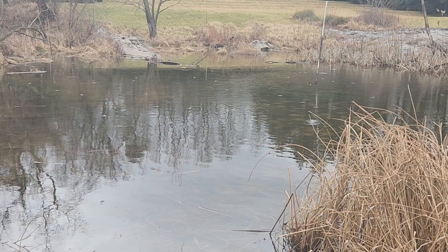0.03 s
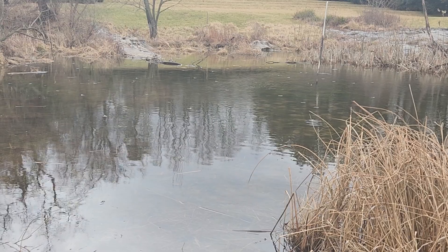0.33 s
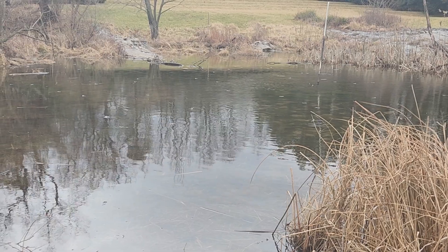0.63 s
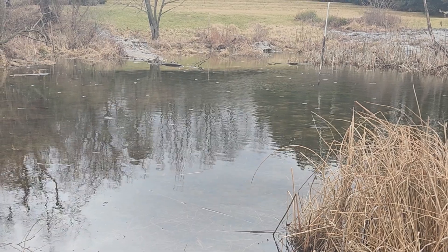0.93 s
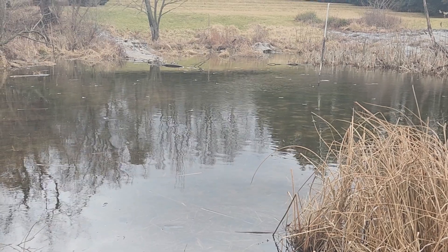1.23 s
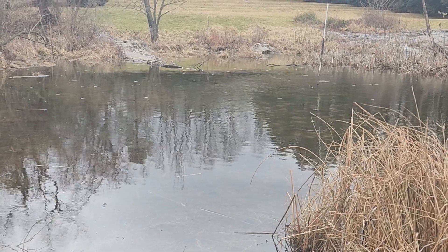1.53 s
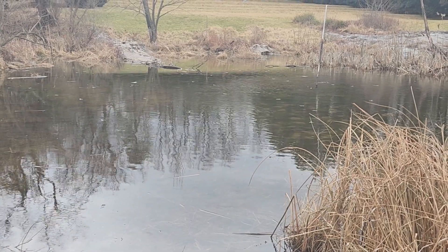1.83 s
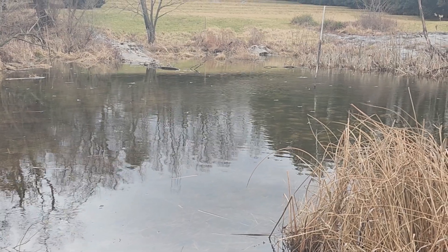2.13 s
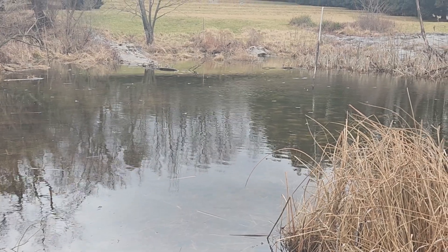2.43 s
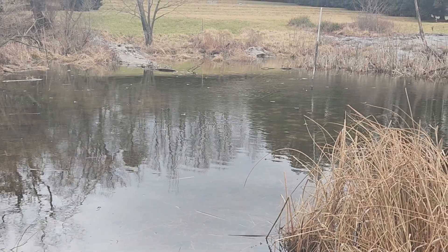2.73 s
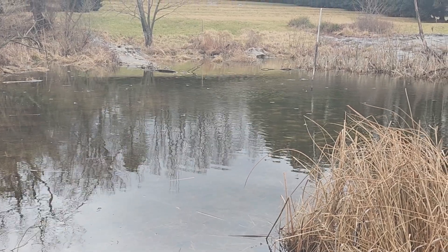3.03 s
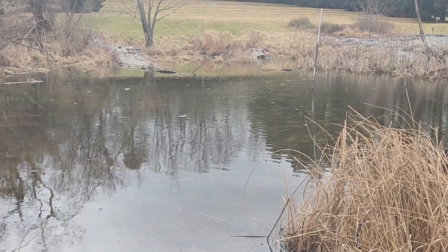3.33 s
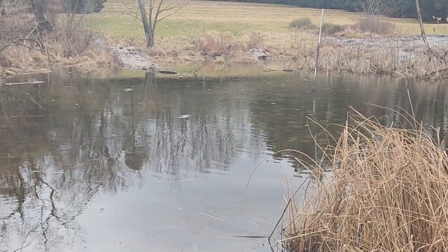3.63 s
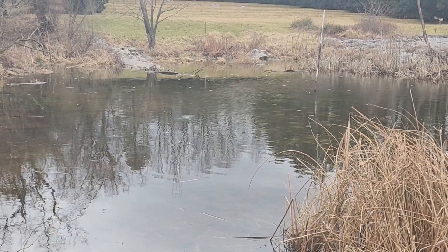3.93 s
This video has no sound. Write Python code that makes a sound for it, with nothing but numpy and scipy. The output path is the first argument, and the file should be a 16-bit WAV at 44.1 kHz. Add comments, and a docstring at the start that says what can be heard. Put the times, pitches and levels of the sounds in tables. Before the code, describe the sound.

Many frogs croak in a dense, overlapping chorus of short quacks on a pond.

```python
"""Wood frogs quack all over a pond in open country. Each croak is a short, quickening train of
pulses that makes the frog's vocal sacs ring. Farther frogs fill the gaps, small birds chirp high
and faint, and both echo off the banks. A low rumble, a soft hiss and puffs of wind lie underneath.
The microphone opens with a bump and a rub of the hand; dry reeds tick now and then."""
import sys
import numpy as np
from scipy import signal
from scipy.fft import rfft, irfft, next_fast_len
from scipy.io import wavfile
from scipy.ndimage import uniform_filter1d, map_coordinates

SR = 44100
rng = np.random.default_rng(int(sys.argv[2]) if len(sys.argv) > 2 else 0)


def pcm_store(signal):
    """Save signal as 16-bit PCM."""
    levels = np.round(np.clip(np.atleast_2d(signal), -1, 1) * 32767)
    wavfile.write(sys.argv[1], SR, levels.astype(np.int16).T)


N = 176400  # 4 seconds
TIME = np.arange(N) / SR


def amp(db):
    """Turn decibels into a gain."""
    return 10 ** (np.asarray(db) / 20)


def unit(x):
    """Scale a sound to an average (rms) level of 1."""
    return x / np.sqrt(np.mean(x ** 2) + 1e-20)


def along(points, hz):
    """Read between (Hz, value) rows on a logarithmic frequency scale."""
    freqs, values = np.transpose(points)
    return np.interp(np.log(hz + 1), np.log(freqs + 1), values)


def curve(rows, t=TIME):
    """Join (seconds, value) rows with straight lines."""
    return np.interp(t, *np.transpose(rows))


def wobble(rate):
    """A smooth curve through `rate` random values a second."""
    return map_coordinates(rng.standard_normal(int(N * rate / SR) + 4), [TIME * rate])


def filtered(x, gain_at):
    """Turn each frequency up or down by gain_at(hz)."""
    size = next_fast_len(N + SR // 2)
    return irfft(rfft(x, size) * gain_at(np.fft.rfftfreq(size, 1 / SR)), size)[..., :N]


def placed(x, pan_db=0, lag_s=0):
    """Make a sound stereo, with the left side pan_db louder and lag_s later."""
    left, right = unit(amp([pan_db / 2, -pan_db / 2]))
    return np.array([left * np.roll(x, round(lag_s * SR)), right * x])


def add(out, start_s, x):
    """Mix the stereo sound x into out from start_s on."""
    start = round(start_s * SR)
    first, end = max(start, 0), min(start + x.shape[1], N)
    if end > first:
        out[:, first:end] += x[:, first - start:end - start]


# How wide noise sounds. Each row: frequency in Hz, side level against the middle in dB.
STEREO_WIDTH = [(50, -5.5), (130, -4), (300, -4), (650, -7), (3000, 0)]

def noise(colour):
    """Stereo noise shaped by (Hz, dB) rows, narrower in the bass."""
    white = rng.standard_normal((2, N))
    mid, side = filtered(white, lambda hz: amp(along(colour, hz)))
    side = filtered(side, lambda hz: amp(along(STEREO_WIDTH, hz)))
    return unit(np.array([mid + side, mid - side]))


# How the rumble eases off. Each row: time in seconds, relative level in dB.
RUMBLE_LEVELS = [(.4, -38), (1.4, -38), (1.8, -41.5), (2.3, -41), (2.55, -44), (4, -44)]
# The tone of the rumble and of the air. Each row: frequency in Hz, relative level in dB.
RUMBLE_TONE = [(20, -10.5), (35, -7), (55, 0), (78, 2.5), (115, -3.5), (160, -11.5), (250, -20), (700, -33),
               (5000, -92)]
AIR_TONE = [(200, -20), (700, 12), (1500, -10), (2500, -6.5), (4300, -13), (5800, -25), (7500, -20.5),
            (8800, -32.5), (15500, -36)]

def outdoors():
    """An uneven low rumble and a soft hiss of air."""
    rumble = amp(curve(RUMBLE_LEVELS) + 4 + 1.6 * wobble(rate=10)) * noise(RUMBLE_TONE)
    air = amp(-51.5 + wobble(rate=1.7)) * noise(AIR_TONE)
    return rumble + air


# Puffs of wind. Each row: time of the peak in seconds, level in dB.
WIND_PUFFS = [(.46, -39), (2.08, -40), (2.24, -37), (2.37, -36)]

def wind_puffs(centre_hz=165, db_per_octave=22, db_per_s=330):
    """Wind hits the microphone in short, soft thuds, different on each side."""
    level = sum(amp(db - db_per_s * np.abs(TIME - peak_s)) for peak_s, db in WIND_PUFFS)
    white = rng.standard_normal((2, N))
    thuds = filtered(white, lambda hz: amp(-db_per_octave * np.abs(np.log2((hz + 1) / centre_hz))))
    return level * unit(thuds)


# A hand rubbing the case. Each row: time in seconds, level in dB.
RUB_LEVELS = [(.085, -41), (.11, -28), (.18, -33.5), (.26, -30.5), (.335, -32.5), (.43, -94.5)]
# The tone of the rub. Each row: frequency in Hz, relative level in dB.
RUB_TONE = [(30, -24), (130, 4), (250, -3), (400, -6), (600, -16), (2000, -37), (8000, -65.5)]

def handling(bump_hz=79.6, bump_fade_s=.08, click_s=.0015, click_rise_s=.00013):
    """A hand on the microphone's case: a click and a low bump, then a brief rub."""
    rub = filtered(rng.standard_normal((2, N)), lambda hz: amp(along(RUB_TONE, hz)))
    out = amp(curve(RUB_LEVELS)) * unit(rub)
    t = TIME[:SR // 4]
    bump = amp(-21 - 60 * t / bump_fade_s) * np.sin(2 * np.pi * bump_hz * t)
    click = -amp(-9.5) * np.exp(-t / click_s) * (1 - t / click_s)
    click *= 1 - np.exp(-t / click_rise_s)
    add(out, start_s=.0955, x=placed(bump) + placed(click, pan_db=12.5))
    return out


# Ticks of dry reeds. Each row: time in seconds, level in dB.
REED_TICKS = [(1.857, -55), (2.31, -69), (2.501, -56), (2.511, -56)]
# The tone of a tick. Each row: frequency in Hz, relative level in dB.
TICK_TONE = [(500, -33), (3000, -7), (7500, 1), (9000, -7.5), (15000, -19)]

def reed_ticks(rise_s=.00075, fade_s=.087, grain_db=3):
    """Dry reeds give tiny, grainy crackles that start sharply and fade fast."""
    level = np.zeros(N)
    for peak_s, db in REED_TICKS:
        t = TIME - peak_s
        level += amp(db - 60 * np.abs(t) / fade_s) * np.clip(t / rise_s + 1, 0, 1)
    return level * unit(amp(grain_db * wobble(rate=700)) * noise(TICK_TONE))


# Bird chirps. Each row: start and length in seconds, first, middle and last pitch in Hz, level in dB.
BIRD_CHIRPS = [(0.519, 0.12, 9100, 7650, 7950, -69), (2.109, 0.14, 7940, 7400, 7650, -72),
               (2.113, .11, 6940, 6770, 6770, -68.5), (3.001, 0.063, 8100, 8230, 8450, -80),
               (3.904, 0.045, 7075, 7233, 6700, -70)]

def birds(waver_hz=130, flutter_db=4):
    """Small birds give thin, wavering whistles, each one a bent arc of pitch."""
    out = np.zeros((2, N))
    for start_s, length_s, *pitches, db in BIRD_CHIRPS:
        size = int(length_s * SR)
        progress = np.linspace(0, 1, size)
        arc_hz = np.polyval(np.polyfit([0, .5, 1], pitches, 2), progress)
        hz = arc_hz + waver_hz * wobble(rate=360)[:size]
        whistle = np.sin(2 * np.pi * np.cumsum(hz) / SR)
        level = np.sqrt(np.abs(np.sin(np.pi * progress))) * amp(flutter_db * wobble(rate=250)[:size])
        add(out, start_s, amp(db) * placed(unit(whistle * level)))
    return out


# The echo of the banks. Each row: frequency in Hz, seconds to fade by 60 dB.
BANK_FADES = [(200, 0.85), (1200, 0.96), (4000, 0.39), (10000, 0.56)]

def bank_echo(x):
    """The banks return a soft wash of sound in which each frequency dies at its own speed."""
    hz, t, spectrum = signal.stft(rng.standard_normal((2, SR // 2)), SR, nperseg=256)
    fade = amp(-60 * t / along(BANK_FADES, hz)[:, None])
    _, tail = signal.istft(spectrum * fade, SR, nperseg=256)
    return signal.fftconvolve(x, tail / np.linalg.norm(tail[0]), axes=1)[:, :N]


def reed_scatter(direct, db, close_db=-30, fade_s=.04):
    """Reeds scatter a croak; the fainter and farther the frog, the bigger the scattered share."""
    tail = rng.standard_normal((2, 2400)) * amp(-60 * TIME[:2400] / fade_s)
    scattered = signal.fftconvolve(direct, tail / np.linalg.norm(tail[0]), axes=1)
    share = amp(-14.5 + .4 * (close_db - db))
    return (direct + share * scattered[:, :direct.shape[1]]) / np.hypot(1, share)


def smear(x, radians=.45, step_hz=400):
    """Reflections off water and stems blur each pulse: its phase wanders with frequency."""
    hz = np.fft.rfftfreq(len(x), 1 / SR)
    wander = map_coordinates(rng.standard_normal(SR // step_hz), [hz / step_hz], order=1)
    return irfft(rfft(x) * np.exp(1j * radians * wander), len(x))


def swell(t, rise_db_per_s, fall_db_per_s, round_s=.0055):
    """A gain that climbs to a rounded peak at t = 0, then fades."""
    slope = np.where(t < 0, rise_db_per_s, fall_db_per_s)
    return amp(-slope * (np.hypot(t, round_s) - round_s))


LEAD_S, TRAIL_S = .05, .042  # how long the pulses run before and after a croak's peak

def ring(times, strengths, centre_hz, tones, focus_db, sag_per_s=2.6, strike_s=.00014):
    """Each pulse rings a few tones; focus_db turns down those away from the second, main tone."""
    ring_samples, croak_samples = 600, 6000
    t = TIME[:ring_samples]
    sag = np.exp(-sag_per_s * np.maximum(times, -.013))[:, None]  # later pulses ring lower
    main_ratio = tones[1][0]
    rings = 0
    for k, (ratio, db, fade_s) in enumerate(tones):
        tone_db = db - focus_db * abs(np.log2(ratio / main_ratio)) + 1.6 * rng.standard_normal()
        wave = (-1) ** k * np.sin(2 * np.pi * centre_hz * ratio * sag * t)
        rings += amp(tone_db - 60 * t / fade_s) * wave
    rings *= strengths[:, None] * (1 - np.exp(-t / strike_s))
    places = np.round((times + LEAD_S) * SR).astype(int)[:, None] + np.arange(ring_samples)
    train = np.bincount(places.ravel(), rings.ravel(), croak_samples)  # add up the overlapping rings
    train = smear(train[:croak_samples])
    return train / np.sqrt(uniform_filter1d(train ** 2, ring_samples).max())  # loudest stretch = 1


# The speed of the pulses. Each row: seconds from the croak's peak, multiple of the pulse rate.
PULSE_SPEED = [(-.04, .4), (-.022, .6), (-.009, 0.8), (0, 1.02), (.03, .8)]

def pulses(rate_hz, bend_per_s=1.2, jitter_cycles=.015, scatter_db=1.5, count=64):
    """Times and strengths of a croak's slightly uneven pulses: they quicken to the peak, then ease."""
    t = np.arange(-LEAD_S, TRAIL_S, 1 / SR)
    bend = np.exp(bend_per_s * rng.standard_normal() * t)  # each croak bends its pitch its own way
    cycles = np.cumsum(rate_hz * bend * curve(PULSE_SPEED, t)) / SR
    cycles -= np.interp(0, t, cycles)
    slips, scatter = rng.standard_normal((2, count))
    beats = np.arange(count) - count // 2 + jitter_cycles * slips
    inside = (beats > cycles[0]) & (beats < cycles[-1])
    return np.interp(beats[inside], cycles, t), amp(scatter_db * scatter[inside])


# The ringing tones of the vocal sacs, and the upper tones above them.
# Each row: multiple of the sac or upper pitch, relative level in dB, seconds to fade by 60 dB.
SAC_TONES = [(.53, -9, 0.017), (.91, 2, 0.019), (1.149, -0.5, 0.019), (1.62, -9, 0.013)]
UPPER_TONES = [(0.721, -5, .004), (0.971, -1.5, 0.009), (1.051, -4.5, 0.0053), (1.75, -28, 0.002)]

def croak(db, rate_hz, pace, sac_hz, upper_hz, upper_db, focus_db, late_s):
    """One quack: pulses ring the upper tones, and the vocal sacs swell just after them."""
    times, strengths = pulses(rate_hz)
    sac_swell = swell(pace * times, rise_db_per_s=778, fall_db_per_s=626.5)
    upper_swell = swell(pace * times + .007, rise_db_per_s=648, fall_db_per_s=498.5)
    sac = ring(times, strengths * sac_swell, sac_hz, SAC_TONES, focus_db)
    upper = ring(times, strengths * upper_swell, upper_hz, UPPER_TONES, focus_db)
    lag_s = late_s + .000025 * rng.standard_normal()
    direct = placed(sac, pan_db=.5 + 1.3 * rng.standard_normal(), lag_s=lag_s)
    direct += amp(upper_db) * placed(upper, pan_db=-5.5, lag_s=lag_s)
    return amp(db) * reed_scatter(direct, db)


# Frog voices by name. Each row: sac pitch in Hz, upper pitch in Hz, upper level against the sac in dB,
# drop in dB per octave away from the main tone, delay of the left side in seconds.
FROG_VOICES = {"bright": (1388, 4580, -18, 0, .00009), "cluck": (1400, 4620, -19, -1, -.00009),
               "pure": (1240, 4020, -22, 12, -.0001), "round": (1226, 4100, -23, 2, .00003),
               "throaty": (1290, 2700, -16.5, 0, -.00009), "raspy": (1310, 4230, -16.5, 0, -.00005),
               "nasal": (1370, 4230, -26, 3, .00011), "plain": (1300, 4250, -23, 2, .00009),
               "dull": (1190, 4250, -27, 1, -.00011)}
# The near frogs. Each row: time of the peak in seconds, relative level in dB, pulses per second,
# pace of swell and fade (1 is usual, more is quicker), name of the voice.
NEAR_CROAKS = [(.135, -35, 370, 1, "nasal"), (.224, -36, 366, .9, "nasal"), (.262, -36, 370, 1.9, "plain"),
               (.358, -41, 340, 1, "raspy"), (.399, -36, 360, 1, "throaty"), (.446, -24, 395, 1, "bright"),
               (.545, -32, 353, .75, "plain"), (.582, -39, 350, 1.5, "dull"), (.675, -24, 367, 1.2, "pure"),
               (.737, -39, 380, 1.4, "raspy"), (.767, -36, 397, 1.1, "raspy"),
               (.842, -38, 362, 1.2, "dull"), (.895, -39, 370, 1.6, "dull"),
               (.926, -35.5, 361, 1.2, "nasal"), (.965, -34, 316, .9, "plain"),
               (1.033, -37.5, 382, .9, "nasal"), (1.138, -35, 308, 1.6, "dull"),
               (1.246, -37.5, 353, 1.1, "plain"), (1.295, -33, 362, 1, "plain"),
               (1.362, -35, 391, .9, "raspy"), (1.458, -35, 398, 1.7, "nasal"),
               (1.5, -38, 370, 1.2, "dull"), (1.546, -34, 378, 1.3, "plain"), (1.59, -38, 400, 1, "raspy"),
               (1.73, -37.5, 339, 1.1, "dull"), (1.79, -37, 366, 1.6, "plain"),
               (1.823, -37.5, 370, 1.3, "plain"), (1.88, -34, 375, 1.5, "nasal"),
               (1.906, -38, 370, 1.2, "nasal"), (1.937, -36, 357, 1.1, "plain"),
               (1.99, -32.5, 349, .8, "plain"), (2.067, -33.5, 379, 1.2, "round"),
               (2.125, -40, 360, 1, "dull"), (2.178, -36, 398, 1.5, "dull"),
               (2.231, -26, 390, 1.8, "cluck"), (2.283, -38, 398, .8, "nasal"),
               (2.474, -36.5, 299, 1.3, "dull"), (2.535, -35, 357, 1.4, "dull"),
               (2.564, -32.5, 382, 1.2, "raspy"), (2.647, -36, 379, 1.5, "plain"),
               (2.677, -34.5, 375, 1.2, "throaty"), (2.707, -35.5, 360, 1, "throaty"),
               (2.759, -32.5, 366, 1.1, "bright"), (2.868, -31, 371, 1.6, "nasal"),
               (2.926, -38, 380, 1.5, "nasal"), (2.959, -31, 382, 1.1, "nasal"),
               (3.002, -38, 370, 1.4, "plain"), (3.085, -34, 391, .9, "round"),
               (3.19, -35.5, 340, .7, "dull"), (3.293, -32, 406, 1.1, "cluck"),
               (3.339, -28, 342, 1.3, "throaty"), (3.363, -33, 300, 2, "dull"),
               (3.402, -25, 402, 1.3, "round"), (3.443, -33, 304, 1.4, "round"),
               (3.504, -34, 365, 1, "raspy"), (3.632, -33.5, 380, 1.4, "plain"),
               (3.681, -32.5, 391, 1.1, "nasal"), (3.761, -36.5, 363, 1.3, "raspy"),
               (3.852, -37.5, 392, 1, "dull"), (3.97, -33.5, 364, 1.2, "round")]
# How crossing the pond colours a croak. Each row: frequency in Hz, gain in dB.
ACROSS_POND = [(200, -27), (460, -10), (580, 3.5), (1500, -1.5), (4600, 0), (5900, -13), (7500, -3),
               (9000, -11.5)]

def frogs(far_per_s=28, far_db=-46, build_s=.002458):
    """Near frogs call in turn over a random scatter of far ones."""
    out = np.zeros((2, N))
    for peak_s, db, rate_hz, pace, voice in NEAR_CROAKS:
        start_s = peak_s - LEAD_S - build_s  # the ringing takes a moment to build up
        add(out, start_s, croak(db, rate_hz, pace, *FROG_VOICES[voice]))
    usual_hz = np.mean([row[2] for row in NEAR_CROAKS])
    voices = list(FROG_VOICES.values())
    for k in range(int(far_per_s * N / SR)):
        slip, loudness, pitch = rng.standard_normal(3)
        call = croak(far_db + 3 * loudness, usual_hz * np.exp(.07 * pitch), 1, *voices[k % len(voices)])
        add(out, (k + slip) / far_per_s - LEAD_S, call)
    return filtered(out, lambda hz: amp(along(ACROSS_POND, hz)))


def scene():
    """Frogs and birds with their echo, plus the reeds, the hand, the wind and the background."""
    chorus, chirps = frogs(), birds()
    echo = bank_echo(amp(-16) * chorus + amp(-6) * chirps)
    return chorus + chirps + echo + reed_ticks() + handling() + wind_puffs() + outdoors()


# The microphone's two openings hear treble unequally. Each row: frequency in Hz, left minus right in dB.
MIC_BALANCE = [(750, -1), (1350, 2), (2000, 1.5), (4300, -1.5), (5000, 3), (6000, 6.5), (7500, 7),
               (10000, 3)]

def record(dry, open_s=.086, fade_in_s=.0017, top_hz=15750):
    """The microphone opens just after the start and keeps nothing above top_hz."""
    opened = dry * np.clip((TIME - open_s) / fade_in_s, 0, 1)
    sides = np.array([[.5], [-.5]])
    return filtered(opened, lambda hz: amp(along(MIC_BALANCE, hz) * sides) * (hz < top_hz))


dry = scene()
out = record(dry)
pcm_store(out)
```